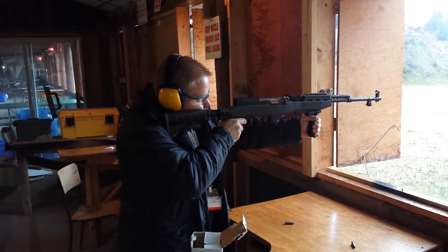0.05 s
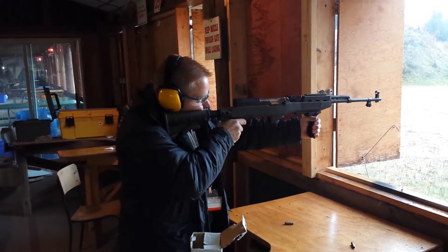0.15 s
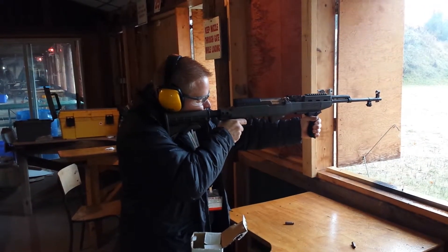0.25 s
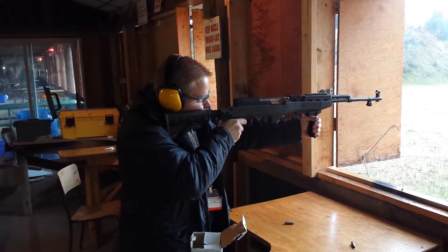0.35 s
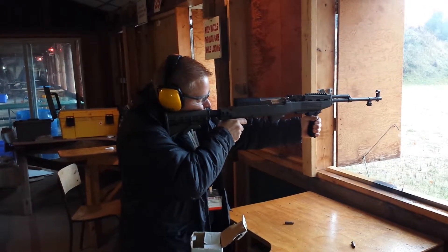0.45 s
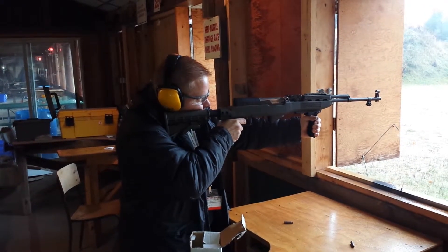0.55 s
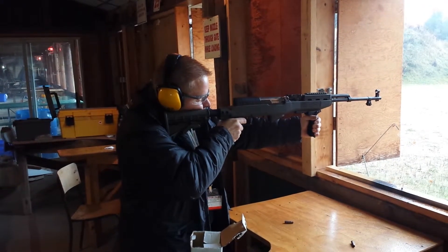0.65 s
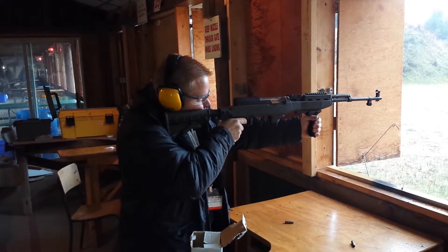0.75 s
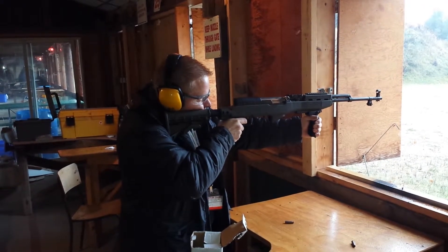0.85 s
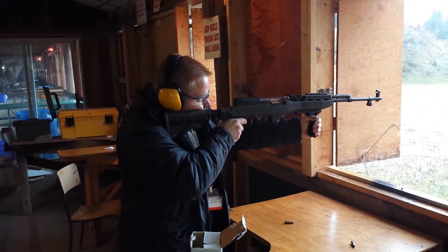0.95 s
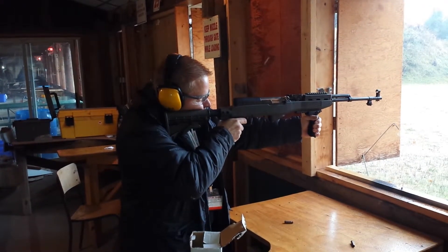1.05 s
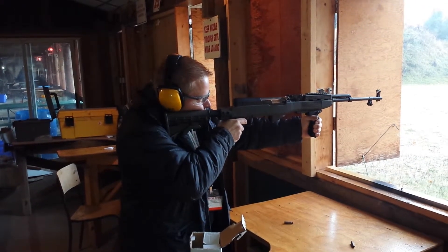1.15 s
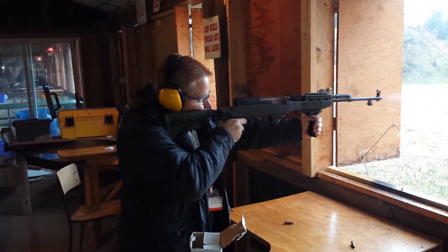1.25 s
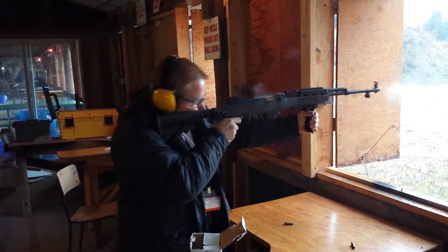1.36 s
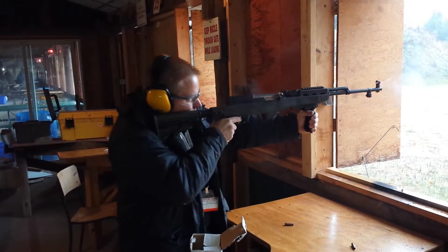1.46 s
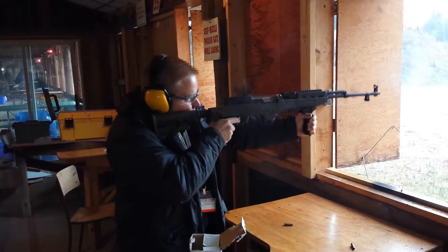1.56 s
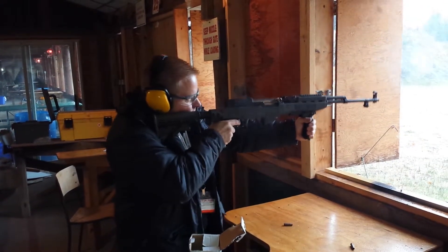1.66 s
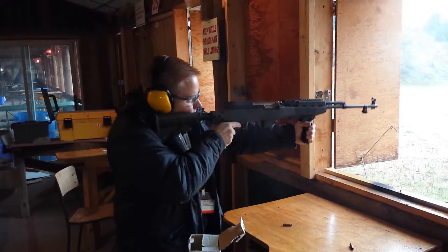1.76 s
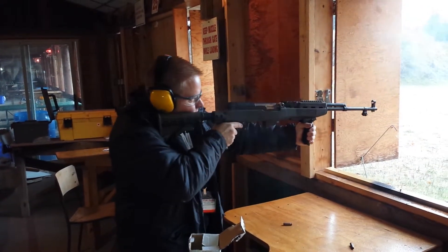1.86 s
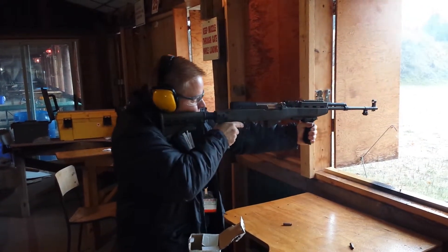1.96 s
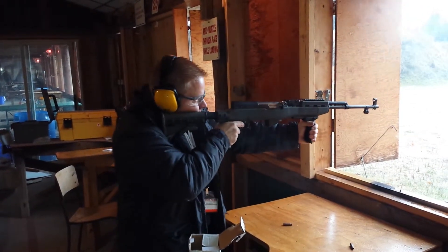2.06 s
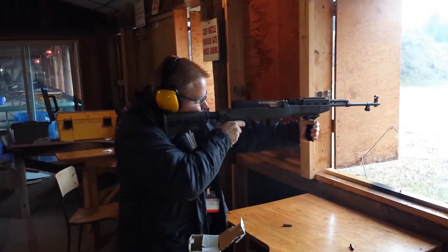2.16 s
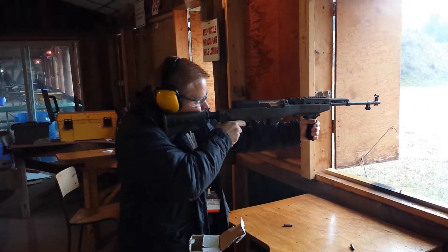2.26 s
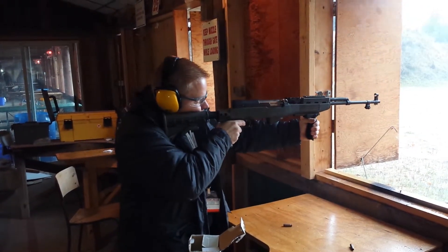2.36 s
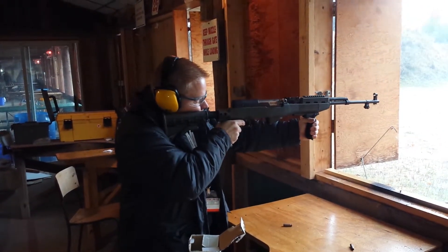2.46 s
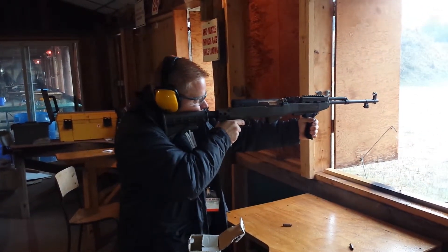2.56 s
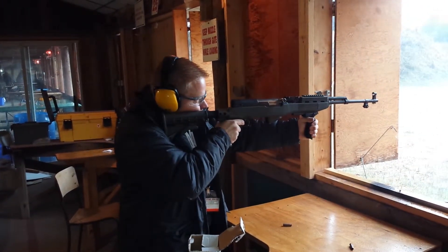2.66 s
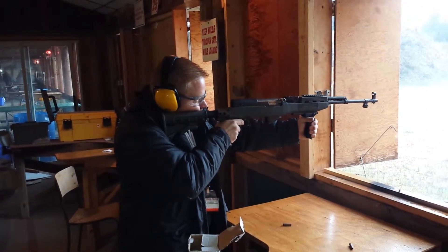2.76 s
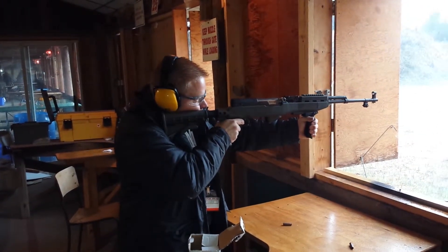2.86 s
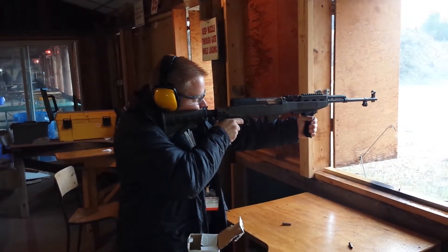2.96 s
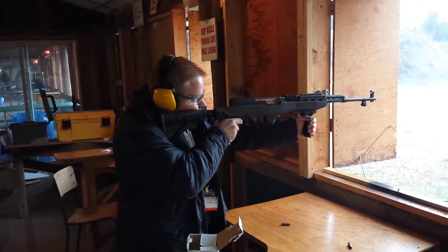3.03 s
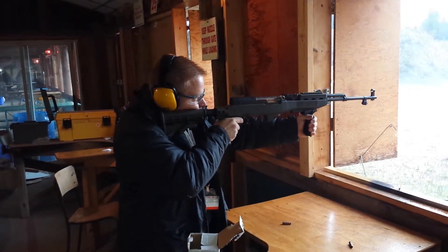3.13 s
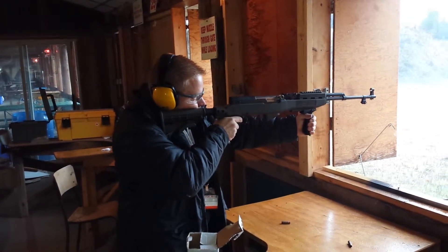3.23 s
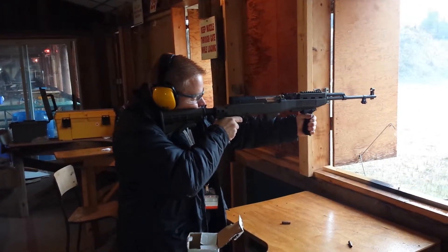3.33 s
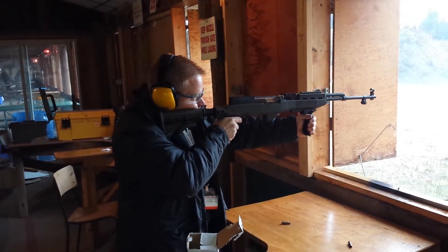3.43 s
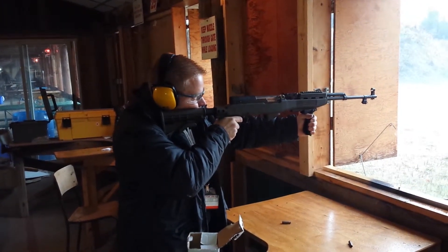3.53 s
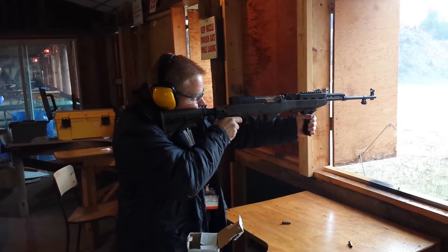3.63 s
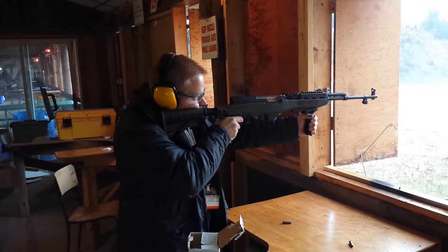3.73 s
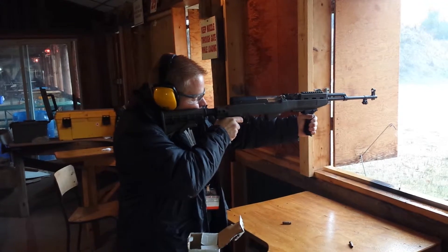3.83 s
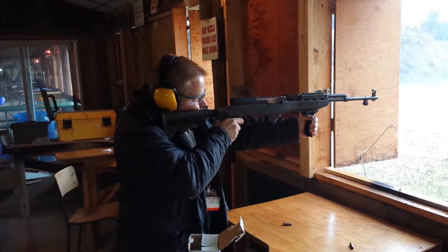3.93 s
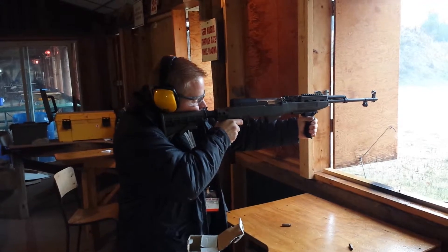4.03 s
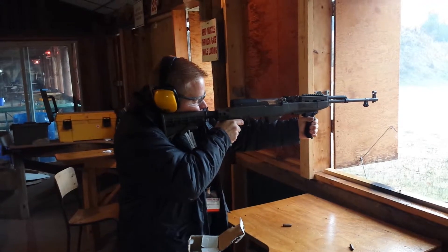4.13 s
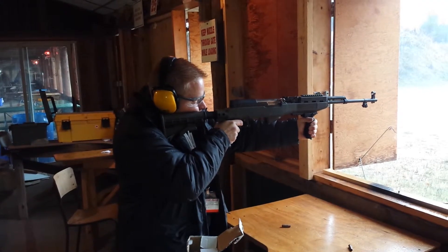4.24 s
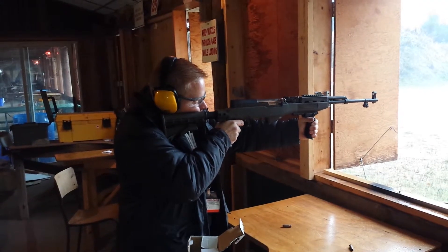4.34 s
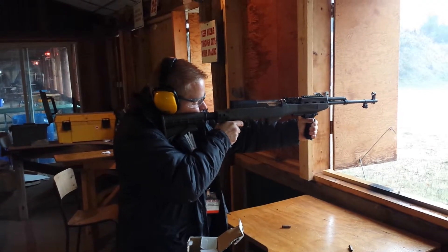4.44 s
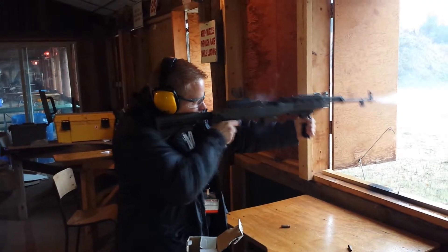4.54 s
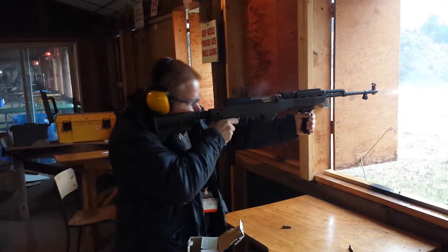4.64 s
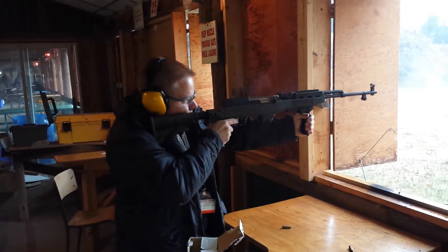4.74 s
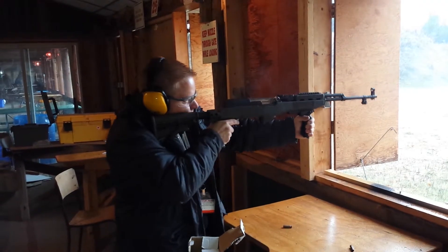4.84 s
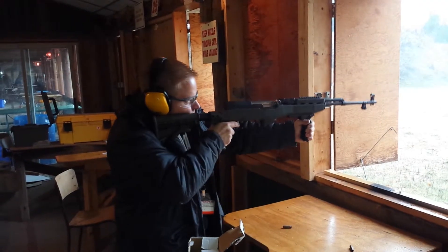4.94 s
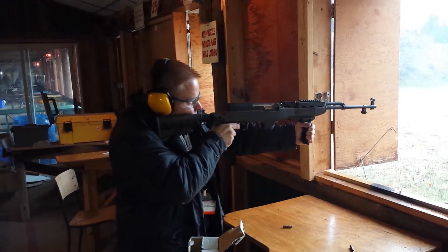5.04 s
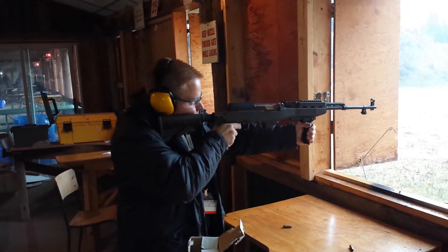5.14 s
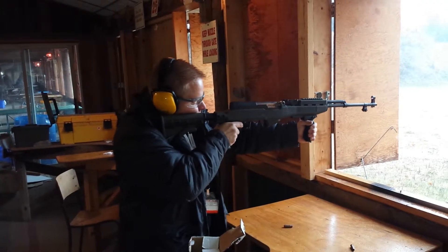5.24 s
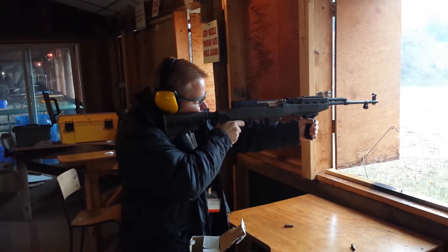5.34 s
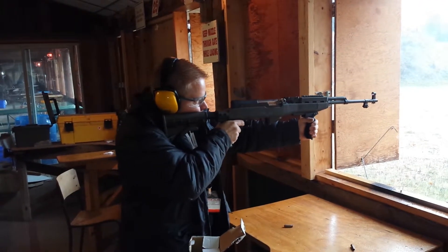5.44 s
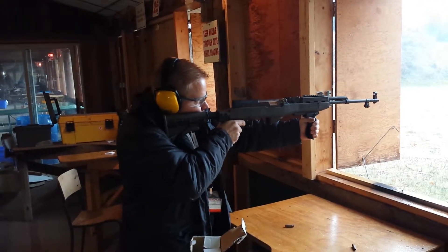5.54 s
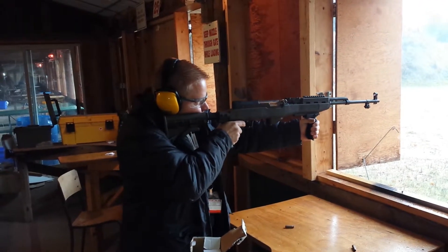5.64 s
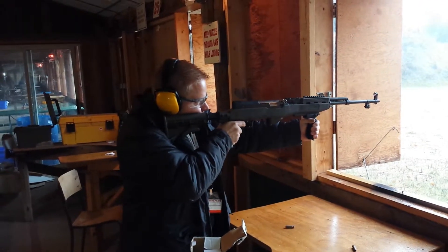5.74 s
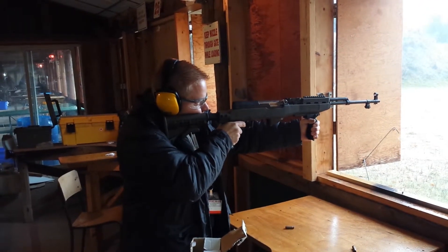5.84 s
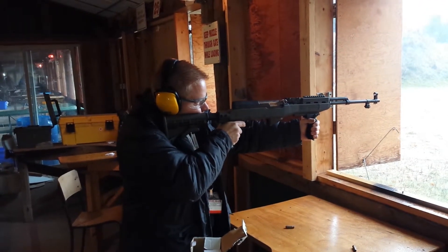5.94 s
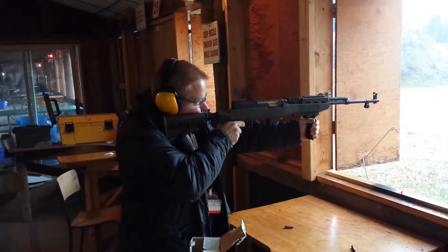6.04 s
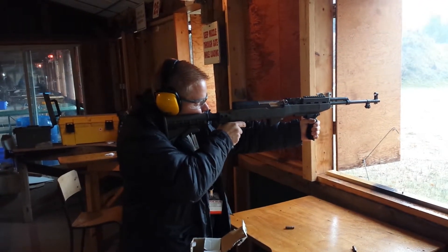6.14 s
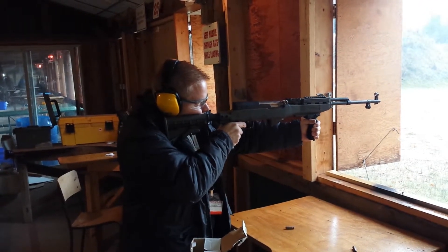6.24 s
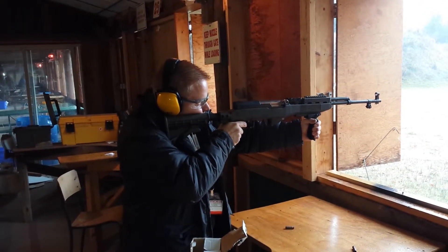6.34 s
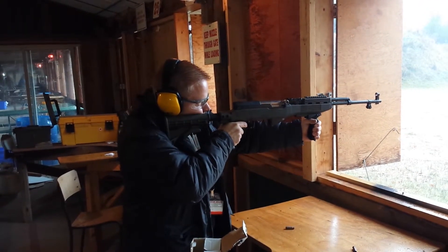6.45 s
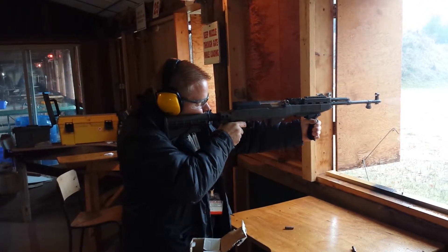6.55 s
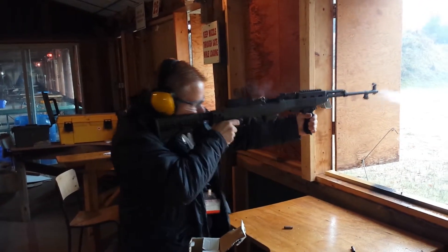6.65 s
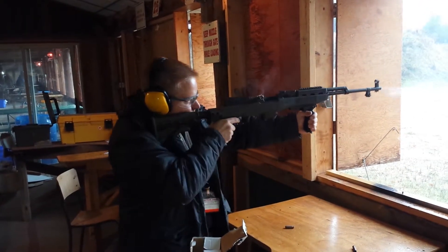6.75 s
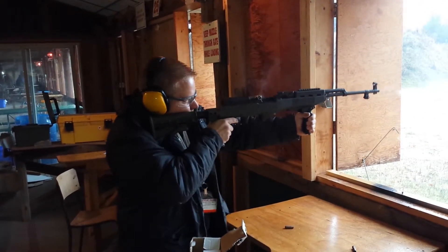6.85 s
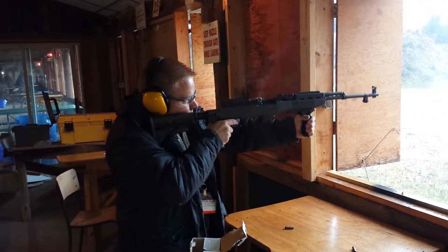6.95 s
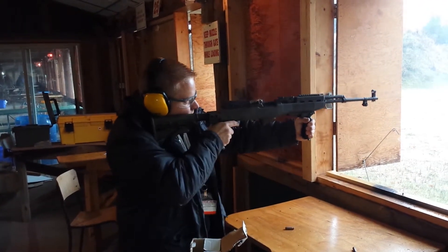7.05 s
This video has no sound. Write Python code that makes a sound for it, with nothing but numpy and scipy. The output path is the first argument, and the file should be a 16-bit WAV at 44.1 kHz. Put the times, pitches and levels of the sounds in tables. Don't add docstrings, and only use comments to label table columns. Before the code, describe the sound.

Inside a wooden shed open to a field, steady broadband hiss with a little low rumble is heard close up in stereo, with faint knocks and rustles at 0.1-1.1 s. At 1.36 s a rifle fires: a bright, hard crack, clipped and gritty for about a tenth of a second, then a boomy wooden-room tail. The hiss drops sharply and recovers after about a second. The ejected case ticks off posts at 1.65 and 2.0, then rings hollowly on the floor until 2.85. Small clicks follow around 3.0-4.3, with a sharper one at 4.42. The second shot blasts at 4.60; its case clangs loudly on sheet steel at 5.18, then knocks a plank at 5.72 amid faint floor ticks to 6.0. The third shot hits at 6.64, with a case glance at 6.93 as its boom decays. Dull far-off echoes trail the first two shots.

```python
import sys
import numpy as np
from scipy import signal
from scipy.io import wavfile
from scipy.ndimage import uniform_filter1d

SR = 44100
rng = np.random.default_rng(int(sys.argv[2]) if len(sys.argv) > 2 else 0)


def to_linear_factor(level_db):
    exponent = np.asarray(level_db, float) / 20
    return 10 ** exponent


def put_to_file(sound):
    columns = np.atleast_2d(sound).T
    safe = np.clip(columns, -1, 1)
    whole_steps = np.round(safe * 32767)
    wavfile.write(sys.argv[1], SR, whole_steps.astype(np.int16))


N = 312669
SIDES = np.array([[.5], [-.5]])

# t/s, blast level/dB
SHOTS = [
    (1.357, 10.5),
    (4.602, 10.5),
    (6.635, 10.5),
]
# f/Hz, level/dB per Hz
AIR = [(12, -53), (20, -20.5), (54, -26.5), (124, -2.5), (189, -8), (337, -5), (387, -10), (1050, -12),
       (1640, -11), (4690, -19), (6360, -17), (12400, -34.5), (15000, -45)]
# f/Hz, likeness/1
HISS_LIKENESS = [(60, 0.96), (180, 0.93), (550, 0.77), (1640, -0.35), (4950, 0.15), (14900, -0.5)]
# f/Hz, likeness/1
SHED_LIKENESS = [(60, 0.95), (130, 0.96), (300, 0.94), (600, 0.65), (1200, -0.17), (3500, -0.0054),
                 (6000, -0.22), (12000, 0.1)]
# f/Hz, difference/dB
PAIR_LEAN = [(100, 0.5), (500, 1.9), (2000, 0.75), (5500, 3.5), (10000, -1), (14000, -6.5)]
# t after the shot/s, level/dB
SLOPES = [(1.18, -31.5), (1.32, -27), (1.65, -33.5), (2.2, -48.5), (2.8, -45.5)]
# t/s, hold/s
LOUD = [
    (1.367, 1.06),
    (4.6, 1.08),
    (5.18, 0.97),
    (6.64, 1.08),
]
# f/Hz, level/dB
MIC = [(300, 5), (4500, -0.5), (6500, 3), (8500, -1), (11000, -11.5), (15000, -20)]
# f/Hz, t60/s
SHED_T60 = [(60, .5), (130, 1), (300, 0.82), (1000, 0.69), (3000, 0.64), (6500, 0.63), (10000, 0.57),
            (15000, 0.4)]
# t/s, peak level/dB, centre f/Hz, share in the shed/dB
KNOCKS = [(0.102, -42.5, 2600, 11), (.512, -39.5, 5500, 7.5), (.54, -42.5, 420, 10.5), (.609, -35, 4540, 9),
          (1.145, -44.5, 7000, -5.5), (2.2, -44, 1100, 4), (2.48, -57, 9000, -2), (3.018, -40.5, 2600, 7.5),
          (3.022, -48, 8000, 10), (3.088, -38.5, 2288, 11), (3.09, -40.5, 7800, 11),
          (3.199, -49.5, 12000, -5.5), (3.679, -33, 4400, 7), (3.906, -38.5, 3930, 6.5),
          (4.259, -42, 4430, 9), (4.418, -26, 6540, 4), (4.42, -29.5, 3120, 8), (4.425, -37.5, 703, 8.5),
          (6.519, -52, 6000, 7)]
# f/Hz, level/dB
BLAST = [(30, -28), (70, -20), (130, -12.5), (250, -7), (450, -3), (800, 1), (1500, 2), (3000, 2.5),
         (6200, 4.5), (8500, -3), (11000, -25.5), (15000, -44)]
# f/Hz, level/dB
BACK_WALL = [(60, -25), (140, -8.5), (450, 1.5), (1000, 4), (2200, 1.5), (4500, -12.5), (9000, -29)]
# f/Hz, level/dB
FIELD = [(50, -44.5), (130, -17.5), (300, -23.5), (800, -21.5), (2500, -26), (7000, -40), (10000, -51),
         (13000, -72.5)]
# f/Hz, width/Hz, level/dB, t60/s
AIR_MODES = [(135.1, 16.8, -5.5, 1.2), (136, 58, -28, 3.8), (181.7, 16, -8.5, 1.4), (270, 57, -8.5, 1.1),
             (420, 43, 1, 0.73), (503.6, 57, 2, 0.57), (770, 68, 4, .55)]
# f/Hz, level/dB
CRACK = [(100, -34), (1000, -14.5), (3000, -6.5), (5000, 2.5), (6200, 11), (7500, 7), (11000, 0.5),
         (15000, -18)]
# f/Hz, level/dB per Hz
OVERLOAD = [(60, -14), (130, -1), (300, -2.2), (600, -13.5), (8000, -39.5), (10500, -20.5), (14500, -19.5)]
# t/s, peak level/dB
GLANCES = [(1.653, -15), (1.984, -15.5), (6.931, -15.5)]
# centre f/Hz, width/octaves, share in the shed/dB, left-right difference/dB
GLANCE = (7300, 0.7, -6, -3)
# t/s, peak level/dB, air column f/Hz, column and case wall level/dB against the peak
FIRST_CASE = [(1.984, -21.5, 2260, -24.5, -12), (2.509, -31, 2110, -6.5, -15),
              (2.704, -40.5, 2280, -2.5, -22), (2.767, -42, 2250, -9, -9), (2.84, -39, 2250, -20, -4)]
SECOND_CASE = [(5.485, -39.5, 2400, -16.5, -27), (5.724, -36.5, 2400, -38, -18),
               (5.87, -56, 2400, -15, -20), (5.938, -42.5, 2400, -13, -33.5), (6.008, -47, 2400, -26, -5)]
# tick centre f/Hz, wall f/Hz, width/Hz, t60/s
CASE_WALL = [
    (5500, 12950, 96, 0.28),
    (3000, 13500, 60, .22),
]
# multiple of its f/1, width/Hz, level/dB, t60/s
COLUMN = [
    (1, 120, 1.3, 0.25),
    (3.2, 500, 0, 0.26),
]
# t/s, peak level/dB, centre f/Hz, width/octaves, share in the shed/dB
SHEET_HIT = (5.183, -7, 6100, 0.92, 10)
PLANK_HIT = (5.724, -26.5, 1398, 1.22, 7)
# f/Hz, width/Hz, level/dB, t60/s
SHEET = [(3760, 200, -15, 0.24), (3690, 58, -8.5, 0.39), (6690, 140, -12, .2), (5530, 200, -20, .25)]
PLANK = [(734, 195, -6.5, 0.52), (1190, 350, -7.5, .25), (1950, 220, -2, 0.3), (2400, 370, -5.5, .18)]

AIR_DB = -42
REST_DB, DUCK_DB, RECOVER_S = 0.94, -15, 0.74
KNOCK_OCTAVES, KNOCK_PAN_DB = 0.87, 0.7
OVERLOAD_DB, OVERLOAD_S = -13, 0.12
TICK_OCTAVES, FLOOR_SHED_DB, FLOOR_PAN_DB = 1.1, 2.5, 1.5
DULL_OCT_PER_DB = .035


def read(points, hz):
    f, value = np.transpose(points)
    return np.interp(np.log(hz + 1), np.log(f + 1), value)


def evened(x):
    return x / np.sqrt(np.mean(x ** 2) + 1e-20)


def add(mix, s, sound):
    part = mix[:, round(s * SR):][:, :sound.shape[1]]
    part += sound[:, :part.shape[1]]


def noise(length, level_db, likeness, size=512):
    hop = size // 2
    hz = np.fft.rfftfreq(size, 1 / SR)[:, None]
    t = np.arange(length // hop + 5) * hop / SR
    draws = rng.standard_normal((4, len(t), len(hz)), dtype=np.float32)
    a, b, c, d = draws.transpose(0, 2, 1)
    like = np.clip(read(likeness, hz), -1, 1)
    left = a + 1j * b
    right = like * left + np.sqrt(1 - like ** 2) * (c + 1j * d)
    z = np.array([left, right]) * to_linear_factor(level_db(hz, t))
    z *= to_linear_factor(SIDES[:, :, None] * read(PAIR_LEAN, hz))
    sound = signal.istft(z, window="cosine", nperseg=size, noverlap=hop)[1]
    return sound[:, :length] / np.sqrt(2.43 * size)


def outdoors():
    def air_db(hz, s):
        patches = uniform_filter1d(rng.standard_normal((len(s), len(hz))), 6, 0)
        patches = evened(uniform_filter1d(patches, 14, 1)).T
        swell = evened(uniform_filter1d(rng.standard_normal(len(s)), 15))
        return read(AIR, hz) + 0.93 * patches + 0.86 * swell

    def echo_db(hz, s):
        distance_dulling = 10 * np.log2((hz + 1) / 750) ** 2
        return np.interp(s, *np.transpose(SLOPES), left=-99) - distance_dulling

    air = to_linear_factor(AIR_DB + 0.28) * evened(noise(N, air_db, HISS_LIKENESS, size=1024))
    echo = noise(3 * SR, echo_db, HISS_LIKENESS)
    for s, db in SHOTS:
        add(air, s, to_linear_factor(db) * echo)
    t = np.arange(N) / SR
    gain_db = [REST_DB, DUCK_DB, DUCK_DB, REST_DB]
    ducks = [np.interp(t - s, [0, .01, hold, hold + RECOVER_S], gain_db) for s, hold in LOUD]
    return to_linear_factor(np.min(ducks, axis=0)) * air


def strike(db, hz0, octaves, shed_db, pan_db):
    t = np.arange(SR // 3) / SR

    def colour(hz):
        return read(MIC, hz) - 6 * (np.log2((hz + 1) / hz0) / max(octaves, .2)) ** 2

    def tail_db(hz, s):
        return colour(hz) - 60 * s / (.5 * read(SHED_T60, hz))

    tail = noise(len(t), tail_db, SHED_LIKENESS, size=256)
    tail /= np.sqrt(np.mean(tail[:, :800] ** 2))
    tick = evened(noise(1024, lambda hz, s: 0.49 * colour(hz) + 0 * s, SHED_LIKENESS, size=128))
    tick = np.resize(tick.T, tail.T.shape).T * np.exp(-t / 0.0012)
    swell = 1 - np.exp(-t / (0.00024 * to_linear_factor(shed_db)))
    level = to_linear_factor(db - 7.0 + SIDES * pan_db)
    return level * (to_linear_factor(-shed_db) * tick + to_linear_factor(shed_db - 3.5) * swell * tail)


def blast():
    length = 2 * SR
    t = np.arange(length) / SR

    def shed_db(hz, s):
        return read(BLAST, hz) - 60 * s / read(SHED_T60, hz)

    def wall_db(hz, s):
        return read(BACK_WALL, hz) + 6.85 - 60 * s / 0.49

    def field_db(hz, s):
        return read(FIELD, hz) - 60 * s / 2.69 * (1 + hz / 9000)

    def modes_db(hz, s):
        peaks = sum(to_linear_factor(db - 60 * s / t60) / (1 + (2 * (hz - f) / w) ** 2) for f, w, db, t60 in AIR_MODES)
        return 20 * np.log10(peaks + 1e-9)

    def lumps(spread_db, samples):
        return to_linear_factor(spread_db * evened(uniform_filter1d(rng.standard_normal(length), samples)))

    shed = noise(length, shed_db, SHED_LIKENESS, size=256)
    wall = noise(length, wall_db, SHED_LIKENESS, size=256)
    wall *= np.clip((t - .075) / .03, 0, 1) * lumps(1.7, 900)
    field = noise(length, field_db, SHED_LIKENESS)
    modes = noise(length, modes_db, SHED_LIKENESS, size=2048)
    modes *= 1 - np.exp(-(t / 0.11) ** 2)
    front = 1 - np.exp(-(t / .003) ** 2)
    return ((shed + wall + field) * lumps(0.97, 500) + 4 * modes) * front


def crack():
    t = np.arange(SR // 2) / SR
    hiss = noise(len(t), lambda hz, s: read(CRACK, hz) - 60 * s / 0.36, SHED_LIKENESS, size=256)
    return hiss * (1 - np.exp(-(t / 0.006) ** 2))


def overload():
    t = np.arange(SR // 4) / SR
    unlike = [(60, 0), (15000, 0)]
    grit = evened(noise(len(t), lambda hz, s: read(OVERLOAD, hz) + 0 * s, unlike, size=1024))
    growth = np.clip(t / 0.078, 0, 1)
    stop = np.clip((OVERLOAD_S - t) / 0.024 + 1, 0, 1)
    return to_linear_factor(OVERLOAD_DB) * grit * growth * stop


def ring(hz0, width, db, t60):
    t = np.arange(SR // 3) / SR
    r = np.exp(-np.pi * width / SR)
    drive = rng.standard_normal((2, len(t) + 800, 2)) @ [1, 1j]
    slow = signal.lfilter([1], [1, -2 * r, r * r], drive)[:, 800:]
    blur = evened((slow * np.exp(2j * np.pi * hz0 * t)).real)
    core = np.sin(2 * np.pi * (hz0 * t + rng.random((2, 1))))
    decay = to_linear_factor(db + SIDES * read(PAIR_LEAN, hz0) - 60 * t / t60)
    build = 1 - np.exp(-t * width / 0.16)
    fade_out = np.minimum(20 * (t[-1] - t), 1)
    return decay * (1.03 * blur + 0.45 * core) * build * fade_out


def bounce(case, db, column_hz, column_db, wall_db):
    tick_hz, wall_hz, width, t60 = case
    dulled_hz = tick_hz * 2 ** (-DULL_OCT_PER_DB * column_db)
    tick = strike(db, dulled_hz, TICK_OCTAVES, FLOOR_SHED_DB, FLOOR_PAN_DB)
    column = sum(ring(k * column_hz, w, db + column_db + d, fade) for k, w, d, fade in COLUMN)
    return tick + column + ring(wall_hz, width, db + wall_db, t60)


def struck_panel(modes, db, hz0, octaves, shed_db):
    blow = strike(db, hz0, octaves, shed_db, 0)
    return blow + sum(ring(hz, w, db + d, t60) for hz, w, d, t60 in modes)


def scene():
    mix = outdoors()
    for s, db, hz, shed_db in KNOCKS:
        add(mix, s, strike(db, hz, KNOCK_OCTAVES, shed_db, KNOCK_PAN_DB))
    shot = blast()
    for s, db in SHOTS:
        add(mix, s, to_linear_factor(db) * shot)
        add(mix, s, to_linear_factor(db) * crack())
        add(mix, s, overload())
    for s, db in GLANCES:
        add(mix, s, strike(db, *GLANCE))
    for case, bounces in zip(CASE_WALL, [FIRST_CASE, SECOND_CASE]):
        for s, *landing in bounces:
            add(mix, s, bounce(case, *landing))
    for modes, (s, *blow) in [(SHEET, SHEET_HIT), (PLANK, PLANK_HIT)]:
        add(mix, s, struck_panel(modes, *blow))
    return mix


def band_limit(x):
    return signal.sosfilt(signal.butter(12, 15520, fs=SR, output="sos"), x)


def record(dry):
    thin = signal.sosfilt(signal.butter(1, 60, "high", fs=SR, output="sos"), dry)
    clipped = .95 * thin / (1 + np.abs(thin) ** 8) ** (1 / 8)
    return band_limit(clipped)


dry = scene()
out = record(dry)
put_to_file(out)
```